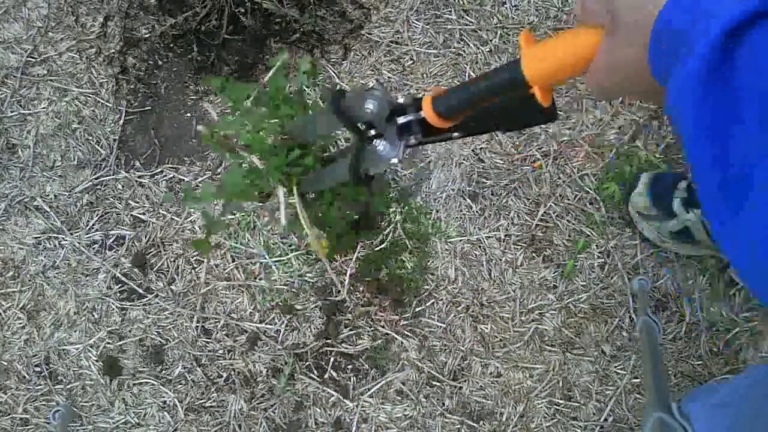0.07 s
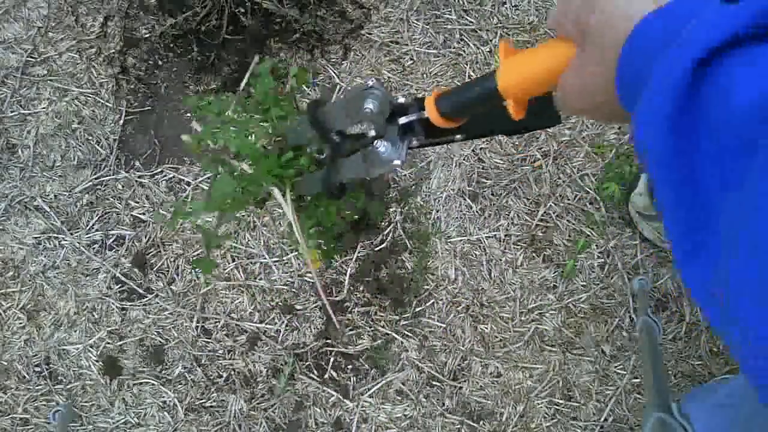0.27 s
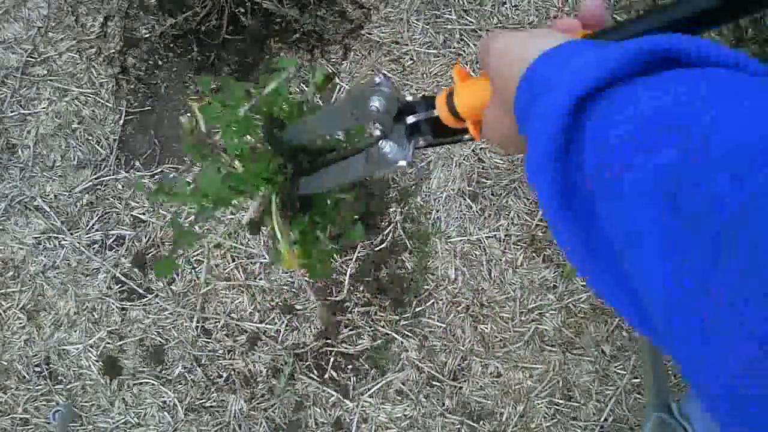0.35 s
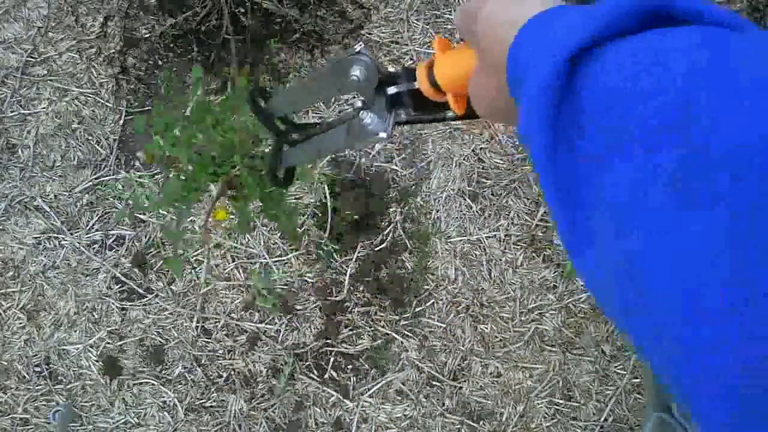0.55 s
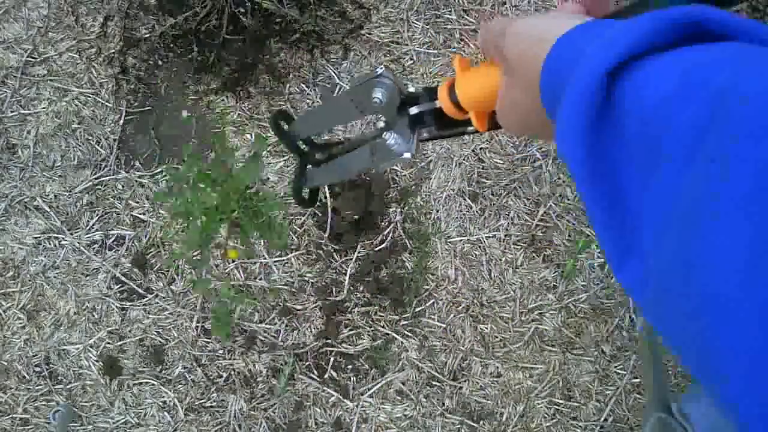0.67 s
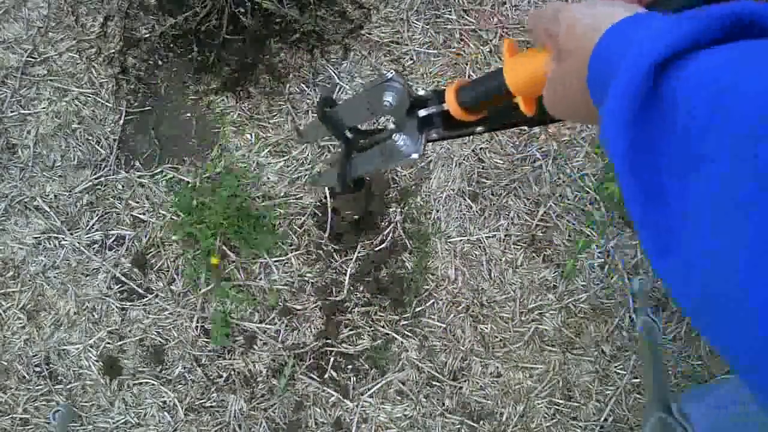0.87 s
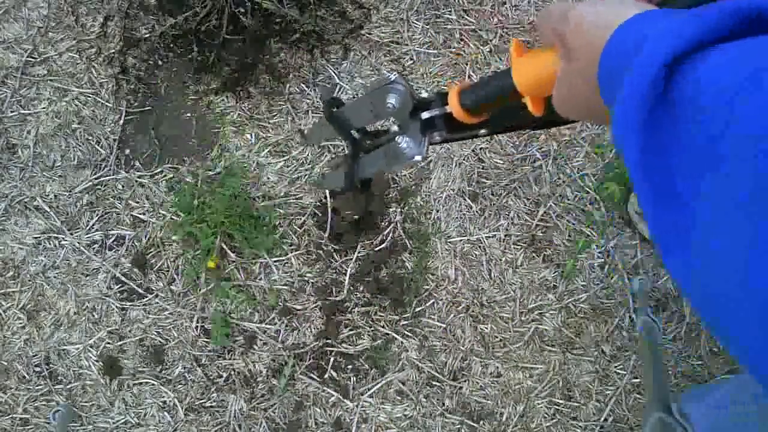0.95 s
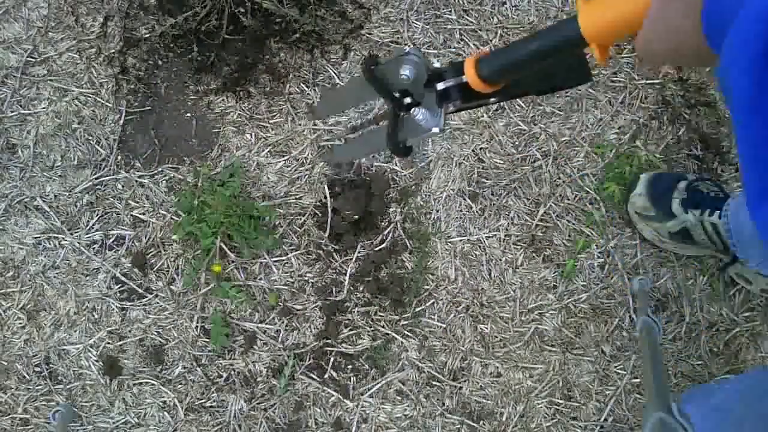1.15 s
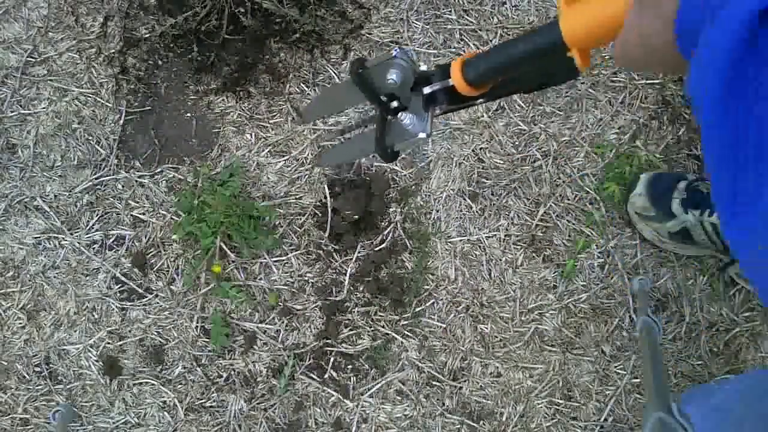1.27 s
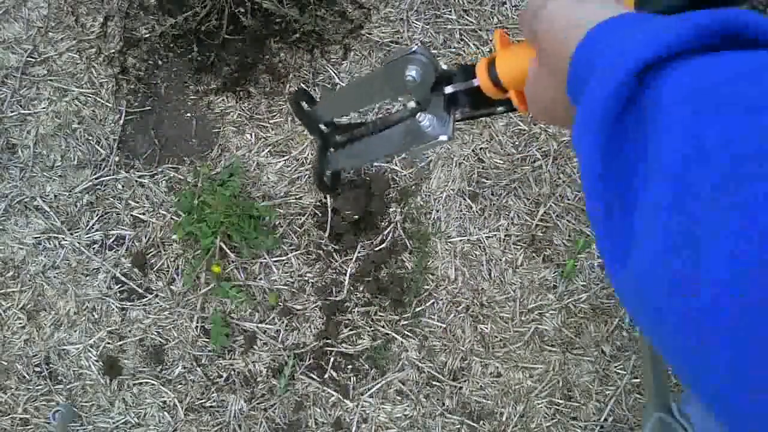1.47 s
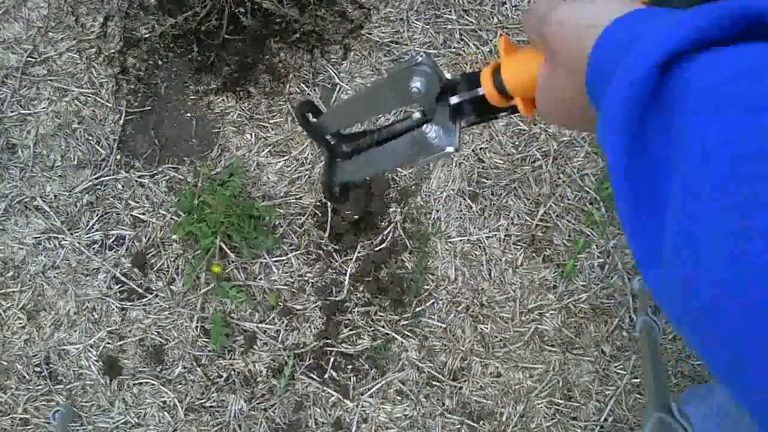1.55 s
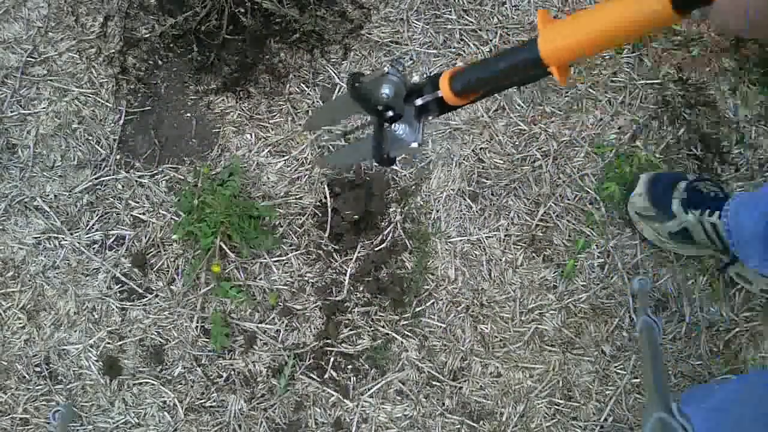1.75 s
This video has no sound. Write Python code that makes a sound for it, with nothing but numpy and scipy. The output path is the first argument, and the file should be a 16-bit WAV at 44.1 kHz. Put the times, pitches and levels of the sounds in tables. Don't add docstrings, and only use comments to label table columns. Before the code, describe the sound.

Hard metallic clacks from a long-handled garden weeder sliding twice, loose parts jingling, weed rustling on straw

```python
import sys
import numpy as np
from scipy import signal
from scipy.fft import rfft, irfft, next_fast_len
from scipy.io import wavfile
from scipy.ndimage import uniform_filter1d, map_coordinates

SR = 44100
rng = np.random.default_rng(int(sys.argv[2]) if len(sys.argv) > 2 else 0)


def elevation(decibels):
    levels = np.asarray(decibels, float)
    return 10 ** (levels / 20)


def generate_wav(signal):
    frames = np.transpose(np.atleast_2d(signal))
    scaled = np.clip(frames, -1, 1) * 32767
    pcm = np.round(scaled).astype(np.int16)
    wavfile.write(sys.argv[1], SR, pcm)


N = 79380


def unit(x):
    return x / np.sqrt(np.mean(x ** 2) + 1e-20)


def filtered(x, response):
    m = next_fast_len(len(x) + 8192)
    return irfft(rfft(x, m) * response(np.fft.rfftfreq(m, 1 / SR)), m)[:len(x)]


def colour(points):
    f, db = np.transpose(points)
    return lambda hz: elevation(np.interp(np.log(hz + 1), np.log(f + 1), db))


def body(peaks, centre_hz=4000, narrow_db=0):
    def response(f):
        total = 0
        for k, (hz, width, db) in enumerate(peaks):
            gain = elevation(db - narrow_db * np.log2(hz / centre_hz) ** 2)
            total = total + (-1) ** k * gain * 1j * f * width / (hz * hz - f * f + 1j * f * width)
        return total
    return response


def wobble(rate):
    return map_coordinates(rng.standard_normal(int(N * rate / SR) + 4), [np.arange(N) * rate / SR])


def patchy(db):
    z = signal.stft(rng.standard_normal(N + 512), nperseg=256)[2]
    field = uniform_filter1d(uniform_filter1d(rng.standard_normal(z.shape), 4, 0), 8, 1)
    return unit(signal.istft(z * elevation(db * unit(field)), nperseg=256)[1][:N])


def add(track, s, sound):
    part = track[max(round(s * SR), 0):][:len(sound)]
    part += sound[:len(part)]


def ring(modes, unsteady=0.5):
    t = np.arange(SR // 3) / SR
    out = 0
    for hz, db, t60 in modes:
        drift = unsteady * np.cumsum(rng.standard_normal(len(t))) / np.sqrt(SR / 400)
        out = out + elevation(db + rng.normal(0, 1.8) - 60 * t / t60) * np.sin(2 * np.pi * hz * t + drift)
    return out


# f/Hz, level/dB (per Hz)
AIR_COLOUR = [(10, -40.5), (25, -14.5), (110, -3), (500, -4), (1000, -10), (1600, -14.5), (2600, -26.5),
              (6000, -28), (15500, -33)]


def air():
    return elevation(-53.5 + 0.89 * wobble(9.2)) * unit(filtered(patchy(1.0), colour(AIR_COLOUR)))


# f/Hz, level/dB, t60/s
SHAFT_MODES = [(1420, -7.5, 0.1), (1673, -4, 0.58), (4330, -2, 0.065), (9000, 5, 0.044)]
SHAFT_UNSTEADY = 2.2
# f/Hz, level/dB (per Hz)
SCRAPE_COLOUR = [(410, -20.5), (700, -11.5), (1670, -11), (2730, -7.5), (3030, -5.5), (3730, -8.5),
                 (8430, -3.5), (14200, -7), (15500, -7)]
# start t/s, peak t/s, level/dB, fall/(dB/s), brightness/dB
SCRAPE_STROKES = [(-.05, .0, -58, 74.5, -6.5), (0.123, 0.174, -44, 148, -0.5), (0.18, 0.208, -28, 150, 2.5),
                  (0.188, 0.226, -32.5, 311.5, 4), (0.232, 0.248, -38.5, 104, -11),
                  (0.476, 0.484, -57, 195, 9.5), (0.581, 0.698, -38, 132.5, 2.5),
                  (0.68, 0.774, -45, 124.5, -1.5), (0.879, 0.927, -37, 197, -0.5),
                  (0.9, 0.947, -41.5, 302, 18.5), (1.2, 1.255, -29.5, 204, -2),
                  (1.277, 1.292, -37, 304, -10.5), (1.33, 1.36, -51.5, 86.5, -12),
                  (1.458, 1.502, -41, 49.5, 2.5), (1.479, 1.561, -29, 120.5, 0),
                  (1.576, 1.653, -37, 189, 10), (1.602, 1.738, -44, -3, 8), (0.982, 1.02, -49.5, 256, 1)]
GRIT_PER_S, GRIT_SPREAD_DB, GRIT_DB = 2100, -6.5, -10
RISE_DB, STILL_DB, HUM_DB = 28, -63, -0.5
SPLIT_HZ = 4800


def slide():
    start, top, db, fall, tilt = np.array(SCRAPE_STROKES).T[:, :, None]
    t = np.arange(N) / SR
    swell = RISE_DB * ((top - t) / np.maximum(top - start, 0.005)) ** 1.24
    power = elevation(db - np.where(t < top, swell, fall * (t - top))) ** 2

    grains = (rng.random(N) < GRIT_PER_S / SR) * rng.standard_normal(N)
    grit = grains * elevation(GRIT_SPREAD_DB * np.minimum(rng.exponential(size=N), 2))
    hiss = patchy(3) + elevation(GRIT_DB) * unit(grit)
    hiss = unit(filtered(hiss, colour([(300, -62.0)] + list(SCRAPE_COLOUR))))

    def low(hz):
        return 1 / (1 + (hz / SPLIT_HZ) ** 4)

    def lean(share):
        return np.sqrt((power * elevation(share * tilt) ** 2).sum(axis=0) + elevation(STILL_DB) ** 2)

    hum = filtered(hiss, body([(hz, 150, level) for hz, level, _ in SHAFT_MODES]))
    dull = filtered(hiss + elevation(HUM_DB) * hum, low)
    bright = filtered(hiss, lambda hz: 1 - low(hz))
    return dull * lean(-1.204) + bright * lean(0.49)


# t/s, level/dB (peak), f/Hz
HANDLING_THUDS = [(0.017, -44, 132), (0.104, -38, 125), (.156, -34.5, 183), (.338, -27.5, 277),
                  (.355, -32, 172), (0.37, -35, 140), (0.239, -35.5, 181), (.41, -37.5, 110),
                  (0.488, -43.5, 132), (0.603, -32, 147), (0.678, -38.5, 131), (1.106, -47.5, 95),
                  (1.142, -39.5, 108), (1.302, -38, 260), (1.504, -36.5, 118)]
THUD_CYCLES, THUD_FLOOR_HZ, THUD_ROUGH = 1.45, 68, 0.26
HANDLING_DB, HANDLING_HZ, HANDLING_SWING_DB = -66.5, 118, 2


def thuds():
    out, t = np.zeros(N), np.arange(SR // 8) / SR
    for s, db, hz in HANDLING_THUDS:
        u = t * hz / THUD_CYCLES
        push = np.sin(2 * np.pi * hz * t) * 6 * u * np.exp(-3 * u)
        rough = unit(filtered(rng.standard_normal(len(t)), body([(hz, hz, 0)])))
        add(out, s, elevation(db) * (push + THUD_ROUGH * rough * 3 * u * np.exp(-1.5 * u)))
    rumble = unit(filtered(rng.standard_normal(N), lambda f: body([(HANDLING_HZ, 130, 0)])(f) ** 2))
    out = out + elevation(HANDLING_DB + HANDLING_SWING_DB * wobble(18)) * rumble
    return filtered(out, lambda f: (1j * f / (THUD_FLOOR_HZ + 1j * f)) ** 2)


# f/Hz, level/dB, t60/s
CLAW_MODES = [(2970, -3, 0.22), (2940, 1, 0.12), (3600, -24, 0.067), (9190, -5, 0.034)]
# f/Hz, width/Hz, level/dB
LINK_PEAKS = [(1180, 500, -7), (1623, 270, 2), (2300, 940, -6.5), (3100, 910, -2.5), (4250, 330, -2.5),
              (5000, 460, -7.5), (6080, 1700, -4), (8300, 1400, -3.5), (9900, 1260, 0.5), (12100, 2000, -4)]
# t/s, level/dB (peak), centre f/Hz, length/s
LINK_KNOCKS = [(0.154, -37, 2300, 0.0012), (.204, -29.5, 2010, 0.003), (0.235, -33, 1680, .001),
               (0.2453, -20.5, 1600, .0015), (0.2537, -29.5, 2720, .0015), (0.259, -31, 4180, 0.00061),
               (0.271, -20, 8430, 0.0018), (0.2716, -19, 2624, .0012), (0.2748, -10, 3170, 0.0024),
               (0.286, -23.5, 1850, 0.001), (0.292, -19, 8940, 0.006), (0.299, -29, 1600, 0.0011),
               (0.3067, -23, 1000, 0.0011), (.307, -21, 5000, .001), (0.3101, -20.5, 9900, .0015),
               (.317, -23.5, 4300, 0.00092), (.319, -31.5, 1500, 0.0027), (0.34, -29, 1830, 0.0039),
               (0.354, -30, 8930, 0.0014), (.3655, -30, 1800, .002), (0.376, -43, 1600, 0.0013),
               (.387, -38, 1600, 0.00084), (.398, -42.5, 1680, 0.0025), (0.439, -41, 1600, 0.0017),
               (0.611, -33, 11300, 0.0045), (0.617, -32.5, 11000, 0.00058), (0.687, -27, 10000, 0.0013),
               (0.998, -33.5, 3740, 0.0049), (1.2554, -17, 2460, 0.0012), (1.255, -16, 5980, 0.0012),
               (1.263, -36, 3000, .002), (1.288, -31, 1500, 0.00084), (1.29, -13.5, 1480, 0.0013),
               (1.3, -13, 9350, 0.005), (1.308, -24, 4470, .001), (1.3192, -16, 1990, 0.0011),
               (1.3215, -16.5, 3100, 0.0021), (1.353, -42, 1600, .001), (1.3567, -18, 9500, 0.0015),
               (1.365, -39, 9000, 0.00089), (1.366, -34.5, 1700, 0.00089), (1.386, -31.5, 2960, 0.0015),
               (1.401, -32.5, 2800, 0.0035), (1.5616, -16.5, 3560, .001), (1.5726, -21.5, 2800, .001),
               (1.606, -29, 3630, 0.0017), (1.609, -23, 3700, 0.0017), (1.639, -28, 2300, 0.0039),
               (1.657, -24, 9000, 0.003)]
RATTLE_DB, RATTLE_SHAFT_DB, RATTLE_RING_DB = 1, -29.5, -44.5
NARROW_DB = 5
STRIKE = 0.8


def rattles():
    out, t = np.zeros(N), np.arange(SR // 20) / SR
    for s, db, hz, length in LINK_KNOCKS:
        u = t / max(length, 0.0004)
        rub = np.exp(-u ** 2) * rng.standard_normal(len(t))
        strike = STRIKE * np.sqrt(length * SR) * (t == 0)
        links, focus = body(LINK_PEAKS, hz, NARROW_DB), body([(hz, 1.6 * hz, 0)])
        knock = filtered(rub + strike, lambda f: links(f) * focus(f))
        add(out, s, elevation(db) * knock / np.abs(knock).max())
        claws = elevation(RATTLE_RING_DB) * ring(CLAW_MODES)
        shaft = elevation(RATTLE_SHAFT_DB) * ring(SHAFT_MODES, SHAFT_UNSTEADY)
        touch = elevation(db - NARROW_DB * np.log2(hz / 3000) ** 2)
        add(out, s, touch * (claws + shaft))
    return elevation(RATTLE_DB) * out


SLAM_TIMES = [
    .2412,
    .9643,
    1.2876,
    1.5743,
]
# level/dB (peak), hold/s, tail level/dB, shaft level/dB, claw level/dB
SLAM_BLOWS = [
    (4, 0.0014, -20, -36.5, -32),
    (-7.5, 0.00055, -12.5, -64, -36),
    (-2, 0.0011, -14.5, -40, -23.5),
    (-2, 0.00054, -16, -56.5, -45),
]
# f/Hz, width/Hz, level/dB
FIRST_OUT_MODES = [(897, 600, -26.5), (1650, 210, -3), (2720, 210, -12.5), (3180, 430, -11),
                   (4274, 440, -3), (5000, 250, -19.5), (5480, 270, -12), (6360, 400, -11.5),
                   (7500, 240, -11), (8450, 900, -9), (10370, 1200, -9), (11200, 550, -15),
                   (11990, 460, -12), (13840, 750, -10.5)]
FIRST_BACK_MODES = [(2065, 180, -7), (2540, 130, -6), (2800, 270, -12), (3180, 450, -8.5),
                    (3830, 330, -5.5), (4300, 340, -18), (5870, 520, -8.5), (6700, 1900, -3.5),
                    (7210, 1200, -0.5), (8000, 440, -5), (9830, 1600, -13), (10500, 300, -14),
                    (11100, 300, -19), (13500, 600, -24.5)]
SECOND_OUT_MODES = [(1000, 1200, -16.5), (1600, 380, -3.5), (2150, 360, -6), (2645, 320, -4.5),
                    (3590, 440, -3.5), (4300, 500, -11.5), (6160, 270, -10.5), (6570, 220, -11.5),
                    (7520, 410, -5.5), (8230, 660, -6.5), (9180, 180, -7), (11000, 300, -7),
                    (11830, 600, -7), (14200, 470, -10.5)]
SECOND_BACK_MODES = [(1360, 400, -12.5), (1810, 200, -8.5), (2586, 120, -6.5), (3610, 460, -5.5),
                     (4720, 200, -13), (5540, 440, -13), (6140, 250, -7.5), (7040, 870, 0), (7400, 450, -5),
                     (8600, 400, -11), (9970, 260, -5), (12300, 700, -10), (13010, 660, -10.5),
                     (14640, 300, -20)]
PUSH_LEVELS = [-26, -23.5, -26.5, -22]
PUSH_PITCHES = [687, 647, 788, 600]
SLAM_DB, CHATTER_DB, CRACK_DB = -1.5, 13.5, -15
TAIL_T60_S, LEAD_DB, LEAD_S = 0.032, -29, 0.003
THIN_HZ = 520


def slams():
    out, t = np.zeros(N), np.arange(SR // 8) / SR - LEAD_S
    modes = (FIRST_OUT_MODES, FIRST_BACK_MODES, SECOND_OUT_MODES, SECOND_BACK_MODES)
    for s, settings, peaks, push_db, push_hz in zip(SLAM_TIMES, SLAM_BLOWS, modes, PUSH_LEVELS, PUSH_PITCHES):
        db, hold, tail_db, shaft_db, claw_db = settings
        after = np.maximum(t - hold, 0)
        crack_and_tail = elevation(CRACK_DB - 60 * after / 0.0032) + elevation(tail_db - 60 * t / TAIL_T60_S)
        shape = np.where(t < 0, elevation(LEAD_DB), crack_and_tail)
        chatter = elevation(CHATTER_DB) * filtered(shape * rng.standard_normal(len(t)), body(peaks))

        blow = np.zeros(len(t))
        for hz, width, level in peaks:
            gain = elevation(level) * 0.0016 / (hold + 0.33 / width)
            tone = np.sin(2 * np.pi * (hz * t + 0.38 * rng.random()))
            blow += (t > 0) * gain * tone * np.exp(-3.5 * width * after)
        blow = elevation(SLAM_DB) * filtered(blow, lambda hz: (1j * hz / (THIN_HZ + 1j * hz)) ** 2)

        push = elevation(push_db) * (t > 0) * np.sin(2 * np.pi * push_hz * t) * np.exp(-np.abs(t) * push_hz * 0.78)
        add(out, s - LEAD_S, elevation(db) * (blow + chatter + push))
        add(out, s, elevation(db + shaft_db) * ring(SHAFT_MODES, SHAFT_UNSTEADY))
        add(out, s, elevation(db + claw_db) * ring(CLAW_MODES))
    return out


SQUEAK_S, SQUEAK_LEN_S, SQUEAK_HZ, SQUEAK_DB = 1.5638, 0.0075, 9190, -21


def squeak():
    t = np.arange(N) / SR - SQUEAK_S
    gate = uniform_filter1d(1. * (t > 0) * (t < SQUEAK_LEN_S), size=90)
    return elevation(SQUEAK_DB) * gate * np.sin(2 * np.pi * SQUEAK_HZ * t), gate


def scene():
    tone, gate = squeak()
    soft = (air() + slide() + thuds() + rattles()) * elevation(-25 * gate)
    mono = soft + slams() + tone
    return np.array([mono, mono])


DRIFT_DB, DRIFT_S, DRIFT_SHARE, DRIFT_FULL_S = -12, 0.2, 0.18, 0.145


def apart(x):
    times = np.array(SLAM_TIMES)[:, None]
    since = (np.arange(N) / SR - times) % 9
    on = uniform_filter1d(1. * ((since > 0.01) & (since < DRIFT_S)).any(axis=0), size=200)
    _, t, z = signal.stft(x * on, SR, nperseg=2048)
    blocks = np.repeat(rng.random((33, len(t))) < DRIFT_SHARE, 32, axis=0)[:len(z)]
    blocks = blocks | (np.abs(t - times - DRIFT_FULL_S) < 0.012).any(axis=0)
    scattered = z * blocks * np.exp(2j * np.pi * rng.random(z.shape))
    return elevation(DRIFT_DB) * on * signal.istft(scattered, nperseg=2048)[1][:N]


def roll_off(x):
    return signal.sosfilt(signal.butter(12, 16510, fs=SR, output="sos"), x)


CLIP, KNEE = 0.93, 6
NOTCH_HZ, NOTCH_WIDTH_HZ, NOTCH_DEPTH = 7860, 80, 0.75
TOP_HZ, ABOVE_DB = 15300, -38


def record(dry):
    x = dry[0]
    cut = x / (1 + np.abs(x / CLIP) ** KNEE) ** (1 / KNEE) - x
    x = x + filtered(cut, lambda hz: 1 - 1 / (1 + (hz / THIN_HZ) ** 4))

    def capsule(hz):
        notch = 1 - NOTCH_DEPTH * np.exp(-((hz - NOTCH_HZ) / NOTCH_WIDTH_HZ) ** 2)
        return notch * np.where(hz < TOP_HZ, 1, elevation(ABOVE_DB))

    x = filtered(x, capsule)
    side = apart(x)
    mix = np.clip([x + side, x - side], -1, 1)
    return roll_off(mix)


dry = scene()
out = record(dry)
generate_wav(out)
```